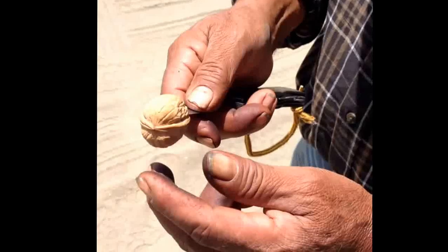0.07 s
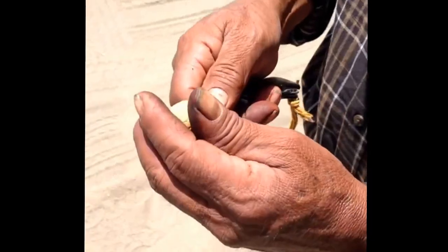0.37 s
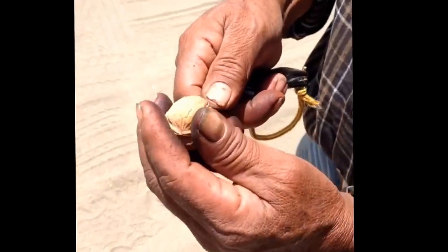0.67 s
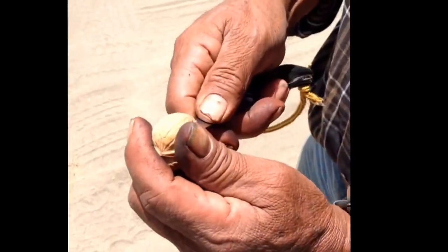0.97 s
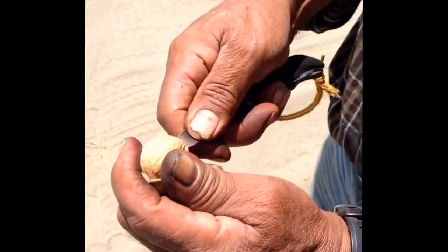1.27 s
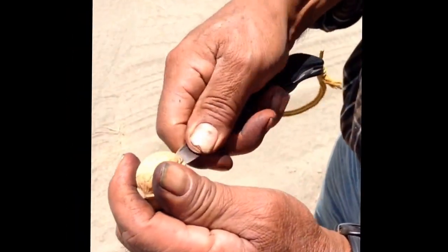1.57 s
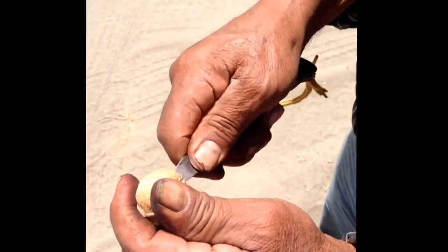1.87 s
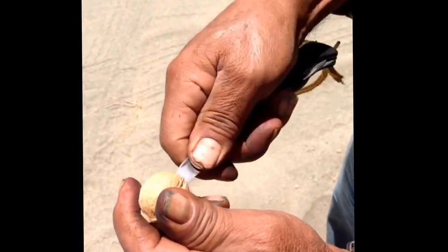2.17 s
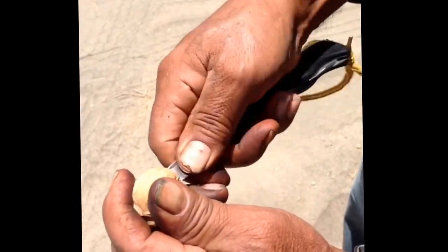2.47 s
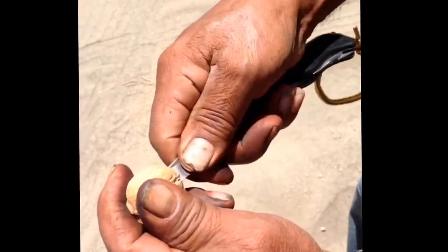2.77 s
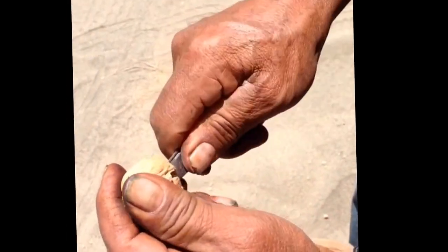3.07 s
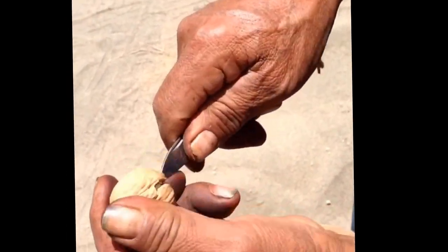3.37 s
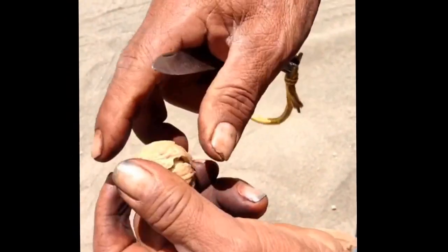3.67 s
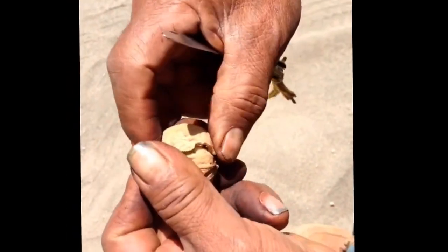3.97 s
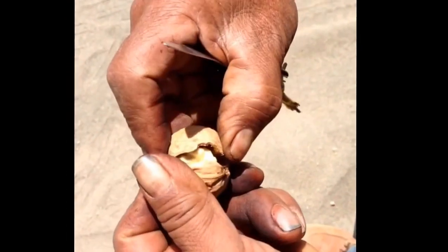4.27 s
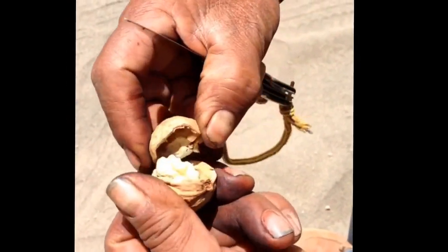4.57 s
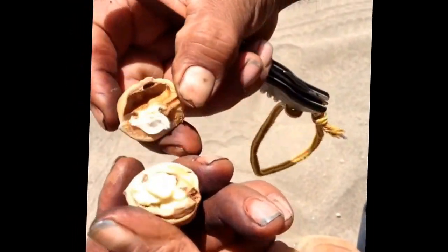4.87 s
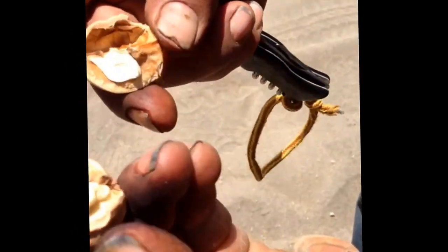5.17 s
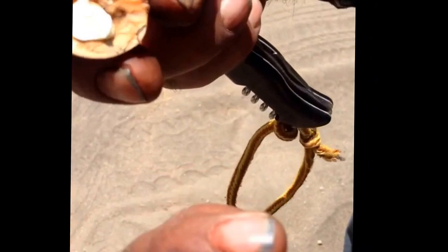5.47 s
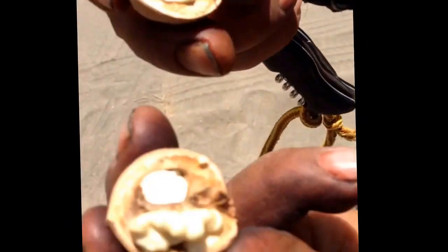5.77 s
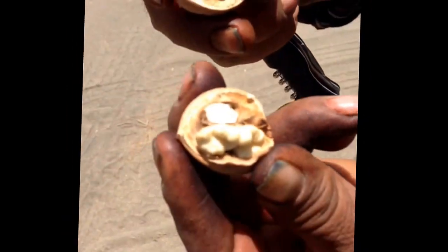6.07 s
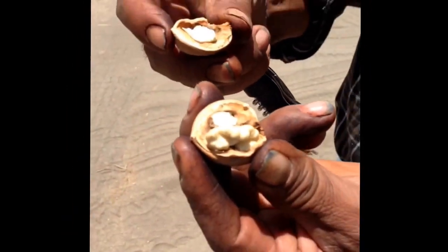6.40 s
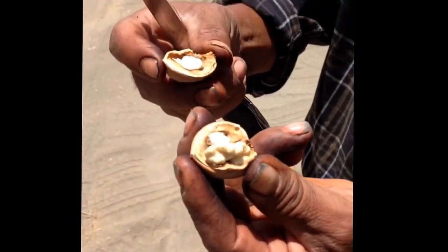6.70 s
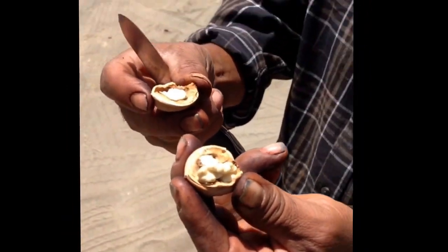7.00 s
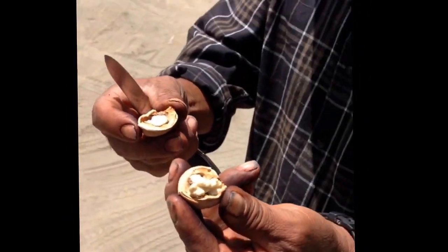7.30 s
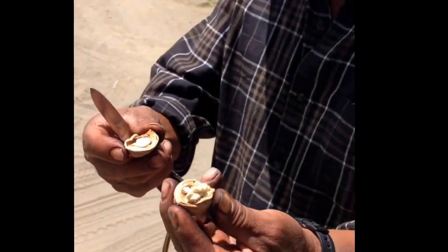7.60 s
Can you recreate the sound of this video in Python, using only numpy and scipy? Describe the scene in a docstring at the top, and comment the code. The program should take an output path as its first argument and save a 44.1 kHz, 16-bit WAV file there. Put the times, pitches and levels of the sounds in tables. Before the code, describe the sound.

Close to the microphone, fingers softly rub and bump on a walnut. A knife twists in the seam, and the shell gives in a few dry, sharp snaps, then a louder, dense run of cracks and tearing fibres. After a pause, one more short crack parts the halves. Outdoors, a distant engine hums faintly throughout under a low rumble and the hiss of open air.

```python
"""Cracking a walnut outdoors

A knife twists in the seam of a walnut, close by, over sandy ground. The shell gives way in dry snaps, each a
tiny fracture ringing the hand-damped nut; fibres tear between them, the halves part, and much later a last
faint hollow crack sounds. Fingers rub and bump on the shell. In the distance an engine hums and whines under
the rumble and hiss of the open air."""
import sys
import numpy as np
from scipy import signal
from scipy.fft import rfft, irfft
from scipy.io import wavfile

SR = 44100
rng = np.random.default_rng(int(sys.argv[2]) if len(sys.argv) > 2 else 0)


def to_wav(s):
    """Save 16-bit WAV."""
    ch = np.atleast_2d(s).T  # columns
    pcm = np.round(np.clip(ch, -1, 1) * 32767)  # PCM
    wavfile.write(sys.argv[1], SR, pcm.astype(np.int16))


N = 336924
TIME = np.arange(N) / SR


def gain_of(db):
    """Decibels to amplitude."""
    return 10 ** (np.asarray(db) / 20)


def unit_rms(x):
    """Scales to an rms of 1."""
    return x / np.sqrt(np.mean(x ** 2) + 1e-20)


def add(mix, s, sound):
    """Mixes a sound in at time s."""
    part = mix[max(round(s * SR), 0):][:len(sound)]
    part += sound[:len(part)]


def coloured(x, points):
    """Filters by a (Hz, dB) spectrum."""
    hz, db = np.transpose(points)
    f = np.fft.rfftfreq(len(x), 1 / SR)
    return irfft(rfft(x) * gain_of(np.interp(np.log(f + 1), np.log(hz), db)), len(x))


def band(x, low_hz, high_hz, order=2):
    """Causal band-pass."""
    sos = signal.butter(order, [low_hz, min(high_hz, SR / 2 - 1)], "band", fs=SR, output="sos")
    return signal.sosfilt(sos, x)


def drift(hz):
    """A smooth random wobble of rms 1, up to about hz changes a second."""
    f = np.fft.rfftfreq(N, 1 / SR)
    return unit_rms(irfft(rfft(rng.standard_normal(N)) / (1 + (f / hz) ** 2), N))


def narrow_noise(hz, width):
    """Noise in one band; rms 1."""
    return unit_rms(band(rng.standard_normal(N), hz - width / 2, hz + width / 2))


def air(level_db=-54, flutter_db=1.5, middle_hz=(480, 1500)):
    """The outdoor bed: a far rumble under an even hiss, its mids fluttering and dipping near the end."""
    # spectrum of open air and microphone hiss: (frequency [Hz], relative density [dB])
    spectrum = [(25, -25), (60, -16), (100, -8.5), (165, 3.5), (250, -0.5), (340, -2.5), (490, -10),
                (720, -10), (950, -12), (1400, -13), (2400, -18.5), (4000, -23), (8000, -27.5),
                (15000, -28.5)]
    # slow ride on the mids: (time [s], gain [dB])
    middle_ride = [(0, 0.5), (1, 1.5), (2.5, 1), (5.3, -0.5), (6.5, 0), (7.2, -3), (7.64, -1)]
    noise = unit_rms(coloured(rng.standard_normal(N), spectrum))
    middle = signal.sosfiltfilt(signal.butter(2, middle_hz, "band", fs=SR, output="sos"), noise)
    middle_db = np.interp(TIME, *np.transpose(middle_ride)) + flutter_db * drift(3.6)
    return gain_of(level_db) * (noise - middle + middle * gain_of(middle_db))


def engine(firing_hz=73.65, waver_db=1.05, waver_hz=4.1, scatter_rad=0.4, wander_rad=0.33):
    """A distant engine's firing harmonics; moving air makes each waver in level and phase."""
    # the strong harmonics: (time [s], second [dB], third [dB], fourth [dB])
    strong_levels = [(0, -60.5, -59.5, -61), (.8, -56, -60.5, -61), (1.6, -60.5, -56, -56.5),
                     (2.3, -54, -56, -55.5), (3.0, -57, -56, -54), (3.7, -57.5, -55.5, -53.5),
                     (4.5, -54, -55.5, -52.5), (5.1, -59, -56, -53), (5.8, -56, -57, -55.5),
                     (6.4, -60, -57.5, -54.5), (7.0, -58.5, -63, -59), (7.64, -60, -60, -50)]
    # the faint ones: (multiple of the firing rate, level against the strong ones' mean [dB])
    overtones = [(1, -22.5), (5, -20), (6, -31), (7, -26), (8, -20), (10, -19), (14, -24), (16, -19.5)]
    times, *columns = np.transpose(strong_levels)
    strong_db = [np.interp(TIME, times, column) for column in columns]
    mean_db = np.mean(strong_db, axis=0)
    harmonics = list(enumerate(strong_db, 2)) + [(k, mean_db + db) for k, db in overtones]
    hum = np.zeros(N)
    for k, db in harmonics:
        level = gain_of(db + waver_db * drift(waver_hz))
        # the harmonics arrive nearly in step, so the hum throbs
        phase = scatter_rad * rng.standard_normal() + wander_rad * drift(waver_hz)
        hum += level * np.cos(2 * np.pi * k * firing_hz * TIME + phase)
    return np.sqrt(2) * hum


def finger_rubs(grain_db=2.5, grain_hz=150, breadth=1.36):
    """Skin and blade drag on the wrinkled shell: a grainy hiss that swells and fades with each slide."""
    # the slides: (start [s], length [s], level [dB], centre [Hz])
    slides = [(.0, 0.25, -66.5, 2190), (0.266, 0.25, -65, 3870), (0.437, 0.11, -62, 2630),
              (2.39, 0.089, -69.5, 5500), (3.503, 0.032, -65.5, 4300), (4.508, 0.044, -67.5, 5500),
              (6.45, 1.4, -77.5, 2700)]
    out = np.zeros(N)
    for s, length, db, hz in slides:
        count = int(length * SR)
        grains = rng.standard_normal(count) * gain_of(grain_db * drift(grain_hz)[:count])
        hiss = band(grains, hz / breadth, hz * breadth, order=1)
        add(out, s, gain_of(db) * unit_rms(hiss * signal.windows.tukey(count, .8)))
    return out


def finger_bumps(pitch_hz=180, rise_s=0.0031):
    """Flesh against the nut: a dull push of a cycle or two."""
    # the fingers taking hold: (time [s], level [dB])
    touches = [(0.507, -38), (.536, -37.5), (0.626, -53), (1.137, -40), (1.665, -43)]
    out, t = np.zeros(N), np.arange(2048) / SR
    bump = t / rise_s * np.exp(1 - t / rise_s) * np.sin(2 * np.pi * pitch_hz * t)
    for s, db in touches:
        add(out, s, gain_of(db) * bump)
    return band(out, 100, 1000)


def engine_whines(hold_s=(1.8, 5.43), fade_s=1.0, drop_db=-15.5):
    """Fuzzy tones from the same far engine; they rise, carry well for a while and sink back."""
    # the whines: (centre [Hz], width [Hz], held level [dB])
    whines = [(646, 51, -69), (742.5, 41, -65.5), (795, 85, -70.5), (2390, 96, -73.5), (2750, 26, -79.5)]
    tones = sum(gain_of(db) * narrow_noise(hz, width) for hz, width, db in whines)
    outside_s = np.maximum(hold_s[0] - TIME, TIME - hold_s[1])
    return gain_of(drop_db * np.clip(outside_s / fade_s, 0, 1)) * tones


def rumble_swells():
    """The far rumble changes colour as bands of noise rise and sink."""
    # bell-shaped swells: (peak time [s], reach [s], centre [Hz], width [Hz], peak level [dB])
    swells = [(1.7, 0.46, 155.6, 44, -54.5), (3.3, .7, 1435, 200, -72.5), (5.7, .6, 657, 160, -66.5),
              (5.95, 0.8, 1050, 260, -66.5), (7.3, 0.78, 357, 127, -59), (7.3, 0.89, 513, 90, -66.5),
              (6.8, 0.3, 1420, 200, -71), (7.2, 0.65, 1870, 350, -72)]
    return sum(gain_of(db) * np.exp(-((TIME - s) / reach) ** 2 / 2) * narrow_noise(hz, width)
               for s, reach, hz, width, db in swells)


def shell_ring(t, scatter=0.028, tick=12):
    """A bare tick and the shell's modes, slightly detuned at random each time as the grip varies."""
    # modes of the hand-damped shell: (frequency [Hz], level [dB], t60 [s])
    modes = [(1490, 5.5, 0.0059), (2043, 3.5, 0.0091), (2740, -8.5, 0.01), (3140, -3.5, .01),
             (3660, 2.5, 0.0067), (4400, -2, 0.0097), (5360, -6.5, 0.0068), (6350, -3.5, .0065),
             (7760, 3, .0044), (10600, -9, 0.0032), (13220, -4, 0.00254)]
    hz, db, t60 = np.transpose(modes)[:, :, None]
    detune = 1 + scatter * rng.standard_normal(hz.shape)
    ringing = gain_of(db - 60 * t / t60) * np.cos(2 * np.pi * hz * detune * t)
    return tick * (t == 0) + ringing.sum(0)


def snap(levels_db, centres_hz, breadths, run_s, splinter=0.25, splinter_hz=4000):
    """A fracture runs through the shell: one impulse, then fine splinters that roughen its treble."""
    t = np.arange(1024) / SR
    splinters = splinter * rng.standard_normal(len(t)) * np.exp(-t / run_s)
    fracture = band(splinters, splinter_hz, SR / 2, order=1)
    fracture[0] = 1
    ring = np.convolve(fracture, shell_ring(t))[:len(t)]
    # body, wall and edge each take a band; neighbours swing against each other
    sound = np.zeros(len(t))
    for db, hz, breadth, sign in zip(levels_db, centres_hz, breadths, (1, -1, 1)):
        part = band(ring, hz / breadth, hz * breadth)
        rms_as_1ms = np.sqrt(np.sum(part ** 2) / (.001 * SR))
        sound += sign * gain_of(db) * part / rms_as_1ms
    return sound


def knock(pitch_hz=1110, decay_s=0.00034):
    """The whole nut recoils in the fingers with one heavily damped swing."""
    t = np.arange(512) / SR
    return np.sin(2 * np.pi * pitch_hz * t) * t / decay_s * np.exp(1 - t / decay_s)


def fibres(length_s, centre_hz, per_s, spread_db, fade, breadth=1.8):
    """A crowd of tiny fibre breaks that ring the shell and grow fainter; rms 1."""
    progress = np.linspace(0, 1, int(length_s * SR))
    chance, size, sign = rng.random((len(progress), 3)).T
    strength = gain_of(spread_db * np.minimum(-np.log(size), 3))
    breaks = (chance < per_s / SR) * np.sign(sign - .5) * strength
    ring = band(shell_ring(np.arange(512) / SR), centre_hz / breadth, centre_hz * breadth)
    return unit_rms(np.convolve(breaks * np.exp(-fade * progress), ring))


def shell_cracks(split_s=3.05, hollow_power=0.78, crumble_db=-34.5, crumble_s=0.021):
    """The blade levers the halves apart: each crack is a snap, a dull knock and a crumbling tail."""
    # the cracks: (time [s], strength [dB], depth [0-1], edge against strength [dB],
    # knock against strength [dB], run time [ms], body [Hz], wall [Hz], edge [Hz])
    cracks = [(1.7965, -28.5, 0.61, 8, -10, .8, 2970, 5600, 10600),
              (1.8125, -32, 0.2, -6, -24, 0.85, 2970, 6600, 11200),
              (1.819, -31, .03, 2.5, -30, 0.46, 2650, 6350, 9800),
              (1.8423, -38.5, .14, 0, -23, .4, 2810, 5900, 10900),
              (1.94, -22, 0.45, -2.5, -15, 0.67, 2650, 6400, 13000),
              (1.967, -49, .1, 0, -23, .4, 2810, 6100, 11300),
              (2.0038, -40, 0.6, 2, -24, .4, 2680, 5700, 10200),
              (2.0054, -29.5, 0.2, -6, -15, 0.43, 2680, 6150, 10800),
              (2.0816, -28.5, .23, -7.5, -27, 0.27, 2960, 6030, 12200),
              (2.2064, -31, .86, -6, -24, .9, 2730, 5300, 9800),
              (2.2149, -21.5, 0.4, 5.5, -33, 0.36, 2700, 4860, 10000),
              (2.2163, -22, .86, -10, -25, 0.76, 2500, 7200, 11500),
              (2.7757, -17.5, 0.71, 1, -11, 0.37, 2400, 5740, 10700),
              (2.8242, -38.5, .9, -14, -23, .8, 2680, 6800, 11400),
              (2.8272, -44, .53, -11, -23, .6, 2360, 5800, 11500),
              (2.831, -43, .27, -7, -25, .4, 2710, 6300, 10600),
              (2.8351, -36, 0.53, -5.5, -24, .45, 2510, 5900, 10500),
              (2.8794, -32, .66, -7, -11, .8, 2590, 5800, 12700),
              (2.8924, -36, .7, -14, -18, .9, 2540, 6900, 10700),
              (2.8957, -26, .75, -17, -8.5, .55, 2700, 6600, 11600),
              (2.8987, -34, .55, -13, -14, .6, 2710, 6700, 11700),
              (2.9006, -30, .66, -10, -17, .6, 2670, 6800, 11100),
              (2.9106, -43, .56, 5, -22, .3, 3010, 7000, 9800),
              (2.9211, -17, 0.12, 3.5, -30, 0.63, 2300, 5900, 10300),
              (2.9267, -37, .47, -10, -26, .6, 2740, 6100, 11300),
              (2.9307, -17.5, 0.78, -11, -27, 0.88, 2580, 6800, 11100),
              (2.9376, -35, .75, -4, -19, 0.89, 2770, 6700, 11000),
              (2.9843, -46, .37, -10, -22, .3, 2420, 6000, 10700),
              (3.016, -50, .37, -7, -22, .3, 2840, 6400, 10900),
              (3.12, -47, .7, -12, -23, .9, 3160, 5200, 10100),
              (3.1485, -52, .23, -5, -22, .3, 2510, 6400, 10400),
              (3.1628, -36.5, .08, -23, -21, 0.85, 2870, 5900, 10700),
              (4.0873, -43.5, .8, -13, -20, 0.55, 1970, 5500, 9800),
              (4.3795, -23.5, 0, -16, -24, .3, 2170, 5600, 10800),
              (4.381, -21.5, 0.34, -13, -21, 0.38, 1920, 5170, 9900),
              (4.3912, -28.5, 0, -10, -22, .3, 2440, 5600, 11400),
              (4.3995, -35.5, 0.12, -17, -20, .35, 2130, 5040, 10000),
              (4.4155, -43, .1, -11, -22, .3, 3120, 5900, 9500),
              (6.794, -49, 1, -18, -14, .6, 1900, 5600, 10500)]
    # reach of each band either side of its centre: (body [ratio], wall [ratio], edge [ratio])
    closed_breadths = [1.345, 1.214, 1.23]
    out = np.zeros(N)
    for s, db, depth, sharp_db, knock_db, run_ms, body_hz, wall_hz, edge_hz in cracks:
        # shallow breaks ring the wall, deep ones the hollow body; the fresh edge adds bite
        angle = np.clip(depth, .02, .98) * np.pi / 2
        body_db, wall_db = db + 20 * np.log10([np.sin(angle), np.cos(angle)])
        levels_db = (body_db, wall_db, db + sharp_db)
        # once split, the open halves ring in narrower bands
        breadths = np.power(closed_breadths, 1 if s < split_s else hollow_power)
        add(out, s, snap(levels_db, (body_hz, wall_hz, edge_hz), breadths, run_ms / 1000))
        add(out, s, gain_of(db + knock_db) * knock())
        crumble = fibres(crumble_s, wall_hz, per_s=660, spread_db=-3.0, fade=1.8, breadth=2.35)
        add(out, s, gain_of(db + crumble_db) * crumble)
    return out


def seam_tears():
    """Fibres in the seam rip in short, dense bursts between the snaps."""
    # the tears: (start [s], length [s], level [dB], centre [Hz])
    tears = [(1.9372, 0.0036, -57, 7000), (2.773, 0.0032, -51, 7000), (2.8, .007, -52, 3900),
             (2.821, .012, -58, 5500), (2.889, 0.023, -53, 2800), (2.9187, 0.014, -39.5, 3000),
             (2.928, 0.028, -44.5, 3300), (2.995, 0.028, -62, 5500), (3.12, .03, -65, 5000),
             (4.4, 0.038, -55, 8000)]
    out = np.zeros(N)
    for s, length, db, hz in tears:
        add(out, s, gain_of(db) * fibres(length, hz, per_s=2600, spread_db=0.0, fade=1.9))
    return out


def surroundings(x, sand_s=0.0056, smear_s=0.00022, sand_db=-17.5,
                 near_db=-21, near_t60=0.058, far_db=-32, far_t60=0.24):
    """Adds a crisp slap off the sand, a short scatter off hands and clothes, and a faint far tail."""
    t = np.arange(SR // 4) / SR
    near, far, sand = rng.standard_normal((3, len(t)))
    near *= gain_of(-60 * t / near_t60) * (t > .001)
    far *= gain_of(-60 * t / far_t60) * (t > sand_s)
    sand *= np.exp(-abs(t - sand_s) / smear_s) * (t > sand_s)
    echoes = sum(gain_of(db) * echo / np.linalg.norm(echo)
                 for db, echo in [(near_db, near), (far_db, far), (sand_db, sand)])
    return x + signal.oaconvolve(x, band(echoes, 590, 9600, order=1))[:N]


def scene():
    """The nut and fingers up close, over the engine and the open air; mono."""
    nut = surroundings(shell_cracks() + seam_tears())
    fingers = finger_rubs() + finger_bumps()
    background = engine() + engine_whines() + rumble_swells() + air()
    return (nut + fingers + background)[None]


def record(dry, open_s=0.036, cutoff_hz=15300):
    """The microphone opens after a moment, rounds off the sharpest peaks and loses the very top."""
    rounded = np.tanh(dry * (TIME > open_s))
    low_pass = signal.firwin(401, cutoff_hz, window=("kaiser", 9), fs=SR)
    return signal.oaconvolve(rounded, low_pass[None], "same")


dry = scene()
out = record(dry)
to_wav(out)
```